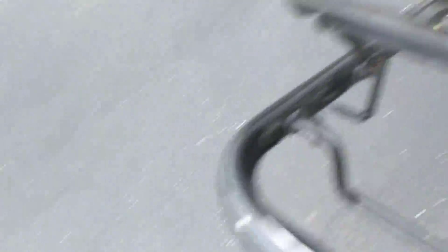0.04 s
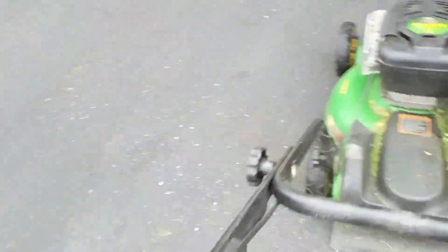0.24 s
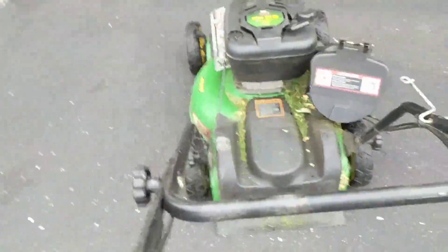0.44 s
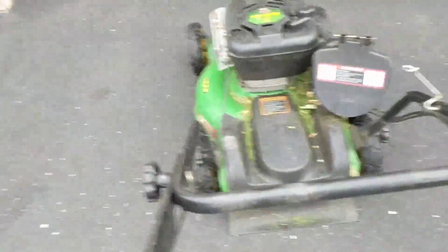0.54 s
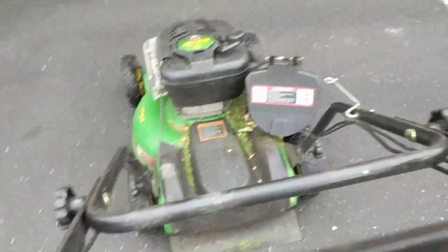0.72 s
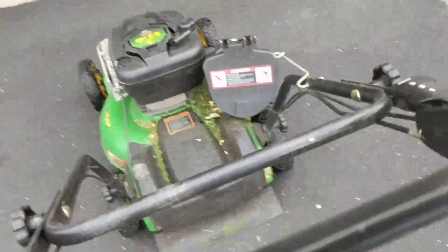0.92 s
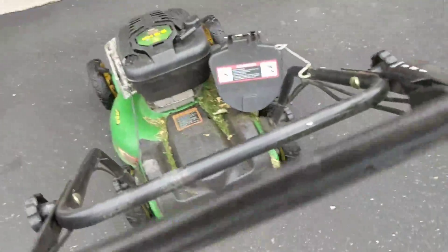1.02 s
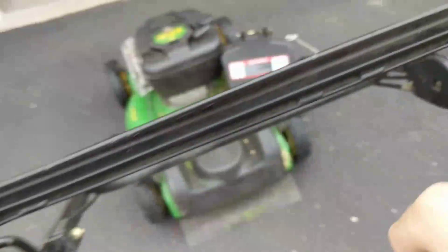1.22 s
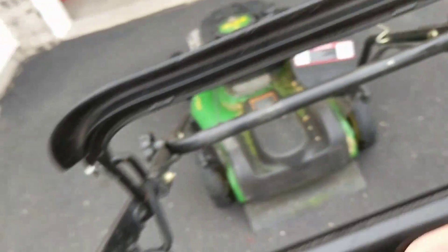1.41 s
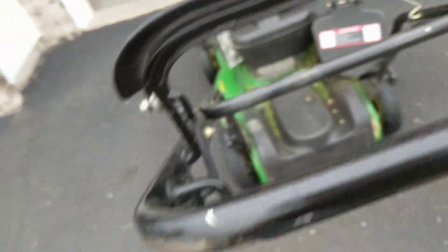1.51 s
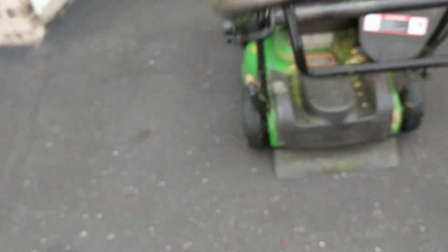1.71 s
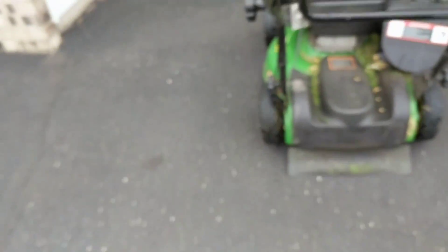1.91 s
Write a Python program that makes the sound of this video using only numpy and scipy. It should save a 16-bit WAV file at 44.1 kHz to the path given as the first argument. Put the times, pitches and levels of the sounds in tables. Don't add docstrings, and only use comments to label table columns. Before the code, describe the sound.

Loud metal clatter as a push mower's handle is swung, a latch bouncing shut early on, then lighter knocks, a brief dry squeak and more rattles; engine off, close hand-held microphone on a paved drive.

```python
import sys
import numpy as np
from scipy import signal
from scipy.fft import rfft, irfft
from scipy.io import wavfile
from scipy.ndimage import uniform_filter1d

SR = 44100
rng = np.random.default_rng(int(sys.argv[2]) if len(sys.argv) > 2 else 0)


def unload_wav(signal):
    wavfile.write(
        sys.argv[1],
        SR,
        np.round(np.clip(np.atleast_2d(signal).T, -1, 1) * 32767).astype(np.int16),
    )


def how_loud(loudness_db):
    steps = np.asarray(loudness_db, float) / 20
    return 10 ** steps


N = 85995


def evened(x):
    return x / np.sqrt(np.mean(x ** 2) + 1e-20)


def read(points, hz):
    f, value = np.transpose(points)
    return np.interp(np.log(hz + 1), np.log(f + 1), value)


def add(mix, start_s, sound):
    part = mix[round(start_s * SR):][:len(sound)]
    part += sound[:len(part)]


def clock(seconds_fraction):
    return np.arange(SR // seconds_fraction) / SR


def resonate(x, hz, width):
    turn = np.exp(2j * np.pi * np.cumsum(hz * np.ones(len(x))) / SR)
    r = np.exp(-np.pi * width / SR)
    return 2 * (turn * signal.lfilter([1 - r], [1, -r], x / turn + 1e-18)).real


def resonate_twice(x, hz, width, second_width):
    return evened(resonate(resonate(x, hz, width), hz, second_width))


def colour(x, points):
    gain = how_loud(read(points, np.fft.rfftfreq(len(x), 1 / SR)))
    return evened(irfft(rfft(x) * gain, len(x)))


def drift(seconds, size=N):
    span = max(int(seconds * SR), 1)
    return evened(uniform_filter1d(uniform_filter1d(rng.standard_normal(size), span), span))


# time in seconds, effort in dB.
EFFORT = [(0.0, -56), (0.03, -63.5), (0.09, -64.5), (0.168, -63.5), (0.306, -40), (0.406, -56.5),
          (0.57, -67), (0.646, -75), (0.846, -87.5), (0.976, -61.5), (1.124, -73.5), (1.276, -72.5),
          (1.428, -60), (1.536, -59), (1.666, -60.5), (1.738, -57.5), (1.95, -56.5)]


def effort_db():
    return np.interp(np.arange(N) / SR, *np.transpose(EFFORT))


# frequency in Hz, level in dB.
AIR_COLOUR = [(15, -27), (25, -12.5), (64, 20), (195, -1), (405, -9.5), (591, 3.5), (2110, -48),
              (6000, -21.5), (16000, -32.5)]
# centre in Hz, width in Hz, level in dB.
LOW_HUMS = [(79, 25.6, -49), (212, 88, -49), (311.7, 46, -54.5), (716, 1180, -53.5)]


def outdoors():
    shake_db = 0.3 * np.minimum(effort_db() + 54.5, 10)
    hums = np.zeros(N)
    for hz, width, db in LOW_HUMS:
        swell_db = 3.0 * drift(0.073)
        hums += how_loud(db + swell_db + shake_db) * resonate_twice(rng.standard_normal(N), hz, width, 2 * width)
    air_db = -52.5 + 4.8 * drift(0.011)
    return hums + how_loud(air_db) * colour(rng.standard_normal(N), AIR_COLOUR)


# frequency in Hz, t60 in seconds.
WALL_T60 = [(300, 0.88), (4000, 0.38), (11000, 0.32)]


def yard(x):
    taps = np.zeros(SR // 2)
    at = np.arange(200, SR // 2 - 20, 20)
    taps[at + rng.integers(0, 20, len(at))] = rng.choice([-1., 1.], len(at))
    hz, t, z = signal.stft(taps, SR, nperseg=256)
    decay = how_loud(-60 * t / read(WALL_T60, hz)[:, None])
    tail = signal.istft(z * decay, SR, nperseg=256)[1]
    return signal.fftconvolve(x, tail / np.linalg.norm(tail))[:N]


# frequency in Hz, level in dB.
RUB_COLOUR = [(190, -25), (320, 16.5), (567, 17.5), (1420, 7), (2070, 10.5), (10800, -11.5), (12700, -3),
              (16000, -31)]


def scuff():
    grains_per_s, grain_spread_db, flicker_db = 730, 4.5, 5.5
    grain_sizes = how_loud(grain_spread_db * np.minimum(rng.exponential(1, N), 3))
    grit = grain_sizes * (rng.random(N) < grains_per_s / SR)
    grit = signal.lfilter([1], [1, -.97], grit) * rng.standard_normal(N)
    rub = rng.standard_normal(N) * how_loud(flicker_db * drift(0.013))
    both = colour(rub, RUB_COLOUR) + how_loud(-5) * colour(grit, RUB_COLOUR)
    return how_loud(effort_db() + 5.5) * both


# start in seconds, length in seconds, level in dB,
# slip rate in Hz.
PIVOT_HOLDS = [(0.863, .012, -46.5, 4560), (.872, 0.019, -42, 5200), (0.885, .012, -46.5, 4900),
               (0.889, 0.015, -53, 5300), (0.912, 0.013, -34, 5700), (0.92, .012, -31, 5010),
               (.927, 0.013, -29.5, 5760), (.929, 0.0087, -35.5, 5050), (0.938, .015, -29, 5320),
               (0.944, 0.015, -29.5, 5990), (.954, 0.017, -40, 5460), (0.959, 0.015, -29, 5020),
               (0.97, .016, -43, 4940), (0.969, 0.02, -37, 5530)]
# multiple of the slip rate, level in dB.
SLIP_ORDERS = [(.5, -25.5), (1, -1.5), (1.5, -24), (2, -7), (3, -18)]


def squeak():
    overlap_s, wander_share, stutter_db, fuzz_share = .005, .012, 5, .22
    out = np.zeros(N)
    hiss_band = signal.butter(4, [8300, 12600], "band", fs=SR, output="sos")
    loudest_db = max(row[2] for row in PIVOT_HOLDS)
    for s, length, db, hz in PIVOT_HOLDS:
        size = int((length + overlap_s) * SR)
        wander = drift(.002, 2000)[:size]
        stutter = how_loud(stutter_db * np.tanh(drift(.0012, 2000)[:size]))
        fuzz = 1 + fuzz_share * drift(.0007, 2000)[:size]
        hiss = evened(signal.sosfilt(hiss_band, rng.standard_normal(2000)))[:size]
        phase = 2 * np.pi * np.cumsum(hz * (1 + wander_share * wander)) / SR
        tone = np.zeros(size)
        for order, order_db in SLIP_ORDERS:
            weak_db = max(order - 2, 0) * (db - loudest_db)
            dull_db = 17 if order > 1 and hz > 5500 else 0
            tone += how_loud(order_db + weak_db - dull_db) * np.sin(order * phase)
        sound = tone * fuzz * stutter + how_loud(-16) * hiss
        add(out, s - overlap_s / 2, how_loud(db + 1) * signal.windows.tukey(size, .5) * sound)
    return out


# start in seconds, peak in dB, centre in Hz, t60 in seconds.
CABLE_TICKS = [(0.2078, -25, 4300, 0.06), (0.2109, -18, 4450, 0.1), (0.2414, -20.5, 5090, 0.033),
               (0.2448, -22, 8500, 0.038), (0.2725, -23.5, 6870, 0.06), (0.28, -22.5, 4430, 0.17),
               (0.346, -27.5, 12400, 0.066), (0.3668, -32.5, 4600, 0.082), (0.4529, -23, 12500, 0.053),
               (0.4732, -27.5, 4070, 0.04), (0.4836, -24, 7100, 0.016), (0.596, -42.5, 11600, 0.24),
               (0.613, -39, 12200, 0.05), (0.814, -47, 3870, 0.046), (1.4763, -43, 4300, 0.12),
               (1.5643, -46, 3770, 0.068), (1.5888, -48, 3870, 0.088), (1.602, -48.5, 4220, 0.2),
               (1.6354, -42.5, 5730, 0.22), (1.71, -52, 5300, 0.045), (1.8798, -34, 5600, 0.092),
               (1.914, -27.5, 12100, 0.14), (1.9249, -28, 4750, 0.16)]


def ticks():
    out, t = np.zeros(N), clock(5)
    crack = np.exp(-t / .0014)
    for s, db, hz, t60 in CABLE_TICKS:
        noise = np.diff(rng.standard_normal(len(t) + 1))
        rattle = resonate_twice(noise, hz, hz * .1, hz * .2)
        rattle = rattle + how_loud(2.5) * resonate_twice(noise, hz, hz, hz)
        shape = how_loud(-2) * crack + how_loud(-9 - 60 * t / t60)
        click = np.sin(2 * np.pi * hz * t) * crack
        add(out, s, .5 * how_loud(db) * (rattle * shape + click) * np.minimum(t / 0.0001, 1))
    return out


# start in seconds, level in dB.
PIN_HITS = [
    (0.207, -31),
    (1.163, -64),
]


def pin():
    out, t = np.zeros(N), clock(5)
    ring = np.sin(2 * np.pi * 8610 * t) * np.cos(2 * np.pi * 28 * t)
    for s, db in PIN_HITS:
        add(out, s, how_loud(db - 60 * t / .3) * ring)
    return out


# start in seconds, peak in dB, frequency in Hz, t60 in seconds.
SMALL_PARTS = [(0.0486, -48, 3580, .02), (.0755, -38, 5050, 0.013), (0.1467, -34, 4550, 0.0043),
               (.2418, -26, 5460, 0.0053), (.2455, -16, 12500, .004), (.2393, -17, 11360, .006),
               (0.2713, -14.5, 7170, .012), (0.272, -14, 14550, 0.0072), (0.345, -17, 12900, 0.0083),
               (.438, -47, 4100, .03), (0.453, -25, 11200, 0.0078), (.4527, -35, 13600, 0.013),
               (.4535, -35.5, 3660, 0.054), (.4735, -29.5, 4390, 0.014), (0.4836, -23, 7390, 0.014),
               (0.598, -39, 11580, 0.021), (1.307, -52, 8400, 0.0064), (1.332, -50, 7800, .004),
               (1.339, -46, 7500, 0.0043), (1.4754, -51, 4450, 0.02), (1.485, -29, 1900, 0.0043),
               (1.5126, -29, 2650, 0.0079), (1.587, -42, 4070, 0.0098), (1.603, -45, 4200, .015),
               (1.608, -39, 2090, 0.02), (1.633, -47.5, 7480, 0.035), (1.685, -28, 2000, 0.0035),
               (1.6856, -29, 5000, 0.0027), (1.701, -25, 5200, .003), (1.744, -44, 4530, 0.0054),
               (1.768, -38.5, 3700, 0.0092), (1.7838, -32.5, 1310, 0.017), (1.882, -27.5, 1485, 0.019),
               (1.8798, -36.5, 2790, 0.022), (1.914, -28, 11900, 0.024), (1.947, -32, 11900, 0.027)]


def pings():
    out, t = np.zeros(N), clock(6)
    rise = np.minimum(t / 0.00029, 1)
    for s, db, hz, t60 in SMALL_PARTS:
        fuzz = 1 + .4 * drift(.0003, len(t))
        add(out, s, how_loud(db - 60 * t / t60) * np.sin(2 * np.pi * hz * t) * rise * fuzz)
    return out


# start in seconds, peak in dB, t60 in
# seconds.
CLIP_SNAPS = [(0.047, -37.5, 0.03), (0.0718, -27, 0.062), (0.145, -34.5, 0.016), (0.201, -20.5, 0.054),
              (0.24, -18, 0.071), (0.273, -5.5, 0.014), (0.763, -45, 0.066), (0.798, -28, 0.027),
              (1.143, -22, 0.056), (0.811, -29.5, 0.08), (1.314, -45, 0.025), (1.387, -52, 0.042),
              (1.512, -31, 0.06), (1.649, -35, 0.056), (1.766, -34, 0.065), (1.777, -27.5, 0.13),
              (1.839, -34.5, 0.085), (1.878, -29, 0.19),
              (1.6853, -36, .018)]


def snaps():
    out, t = np.zeros(N), clock(5)
    band = signal.butter(1, [1530, 6920], "band", fs=SR)
    for s, db, t60 in CLIP_SNAPS:
        grain = how_loud(2 * np.tanh(drift(.0006, len(t))))
        noise = evened(signal.lfilter(*band, rng.standard_normal(len(t)) * grain))
        shape = how_loud(-60 * t / t60) + .5 * np.exp(-t / .0008)
        add(out, s, 0.2 * how_loud(db) * shape * noise)
    return out


# start in seconds, peak in dB, frequency in Hz, t60 in seconds.
DECK_BOOMS = [(0.148, -29, 263, 0.06), (.208, -18, 212, 0.13), (0.272, -26, 127, 0.099),
              (0.299, -30.5, 280, 0.28), (0.489, -34.5, 298, 0.19), (1.2, -43, 215, 0.15),
              (1.078, -36.5, 180, 0.14), (1.281, -37.5, 216.6, 0.12), (1.51, -31.5, 216.2, 0.19),
              (1.745, -37, 137, 0.092), (.275, -26.5, 583, 0.063), (.345, -31.5, 564, 0.14),
              (.24, -22, 1020, 0.048), (0.019, -36, 245, 0.12), (1.325, -36.5, 202, 0.12),
              (1.93, -37, 624, .08)]


def thumps():
    out, t = np.zeros(N), clock(4)
    rise = np.minimum(t / 0.0035, 1)
    for s, db, hz, t60 in DECK_BOOMS:
        add(out, s, how_loud(db - 60 * t / t60) * np.sin(2 * np.pi * hz * t) * rise)
    return out


# frequency in Hz, level in dB, t60 in seconds.
PLATE_MODES = [(600, -19, 0.065), (1360, -26.5, 0.099), (1585, -10.5, 0.038), (1900, -4.5, 0.037),
               (2070, -4, 0.017), (2300, -17, 0.063), (2840, -23.5, 0.077), (4390, -21.5, 0.087)]
# start in seconds, level in dB.
LATCH_BOUNCES = [
    (.2086, -8.5),
    (.2107, -14),
    (.2126, -12),
    (.2168, -11),
    (.2285, -17),
]


def latch():
    out, t = np.zeros(N), clock(6)
    plate = sum(how_loud(db - 60 * t / t60) * np.sin(2 * np.pi * hz * t) for hz, db, t60 in PLATE_MODES)
    for k, (s, db) in enumerate(LATCH_BOUNCES):
        add(out, s, (-1) ** k * how_loud(db) * plate)
    return out


# start in seconds, peak in dB, centre in Hz, t60 in seconds.
FRAME_BLOWS = [(0.047, -50, 740, 0.13), (0.074, -26.5, 730, 0.1), (0.143, -40, 890, 0.19),
               (0.2055, -14, 2040, 0.18), (0.214, -15, 1870, 0.22), (0.271, -25, 1320, 0.31),
               (0.298, -26.5, 2100, 0.23), (.311, -21, 2100, 0.076), (0.345, -36, 1800, 0.11),
               (0.368, -31, 1080, 0.14), (0.451, -28.5, 2730, 0.15), (0.467, -22.5, 1500, 0.1),
               (0.473, -23, 2110, 0.071), (0.612, -36, 2660, 0.11), (0.762, -43.5, 1120, 0.24),
               (0.799, -30, 1450, 0.078), (0.814, -39, 2070, 0.26), (1.081, -27.5, 740, 0.041),
               (1.093, -35.5, 1280, 0.082), (1.141, -34.5, 2730, 0.062), (1.29, -38.5, 600, 0.11),
               (1.454, -41.5, 1230, 0.23), (1.485, -29, 1150, 0.11), (1.513, -22, 1140, 0.075),
               (1.566, -35, 2600, .07), (1.605, -36, 1840, 0.092), (1.651, -29, 1700, 0.05),
               (1.765, -34.5, 2070, 0.15), (1.782, -26.5, 800, 0.16), (1.842, -25, 735, 0.072),
               (1.882, -20, 800, 0.038), (1.925, -26.5, 2010, 0.33)]
# frequency in Hz, width in Hz, level in dB.
FRAME_MODES = [(800, 20, -0.5), (1030, 18, -64), (1336, 62, 8.5), (1655, 8.7, -5.5), (1786, 29, -14),
               (2110, 58, 5.5), (2927, 36, -3)]


def knocks():
    out, t = np.zeros(N), clock(4)
    rise = np.minimum(t / 0.0023, 1)
    lump_db, width_share = 1.5, 0.74
    for s, db, hz, t60 in FRAME_BLOWS:
        lumps = how_loud(lump_db * 1.27 * np.tanh(drift(0.00056, len(t))))
        noise = signal.lfilter([1, -1], [1, -.95], rng.standard_normal(len(t)) * lumps)
        body = resonate_twice(noise, hz, hz * width_share, hz * width_share * 2)
        body = body + how_loud(-5.5) * resonate_twice(noise, 1210, 2600, 2600)
        burst = 0.2 * body * how_loud(-60 * t / t60)
        rings = np.zeros(len(t))
        for f, width, mode_db in FRAME_MODES:
            far_db = 5.6 * abs(np.log2(f / hz))
            decay_db = 60 * t * min(max(width, 35), 90) / 2.26
            rings += rng.standard_normal() * how_loud(mode_db - far_db - decay_db) * np.sin(2 * np.pi * f * t)
        add(out, s, how_loud(db) * (burst + how_loud(-14) * rings) * rise)
    return out


def scene():
    near = squeak() + ticks() + pin() + pings() + snaps() + thumps() + latch() + knocks()
    return (outdoors() + how_loud(-13) * yard(near) + scuff() + near)[None]


def top_cut(x):
    return signal.sosfilt(signal.butter(12, 16530, fs=SR, output="sos"), x)


def record(dry):
    x = signal.sosfilt(signal.butter(3, 45, "high", fs=SR, output="sos"), dry)
    x = signal.oaconvolve(x, signal.firwin(511, 15850, fs=SR)[None], "same")
    return top_cut(x)


dry = scene()
out = record(dry)
unload_wav(out)
```